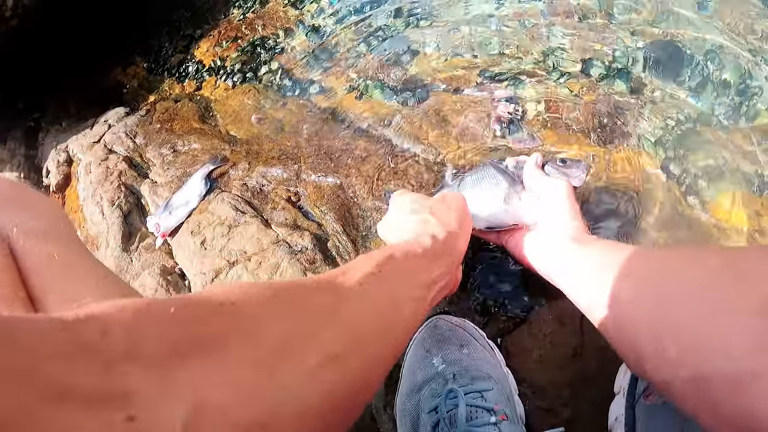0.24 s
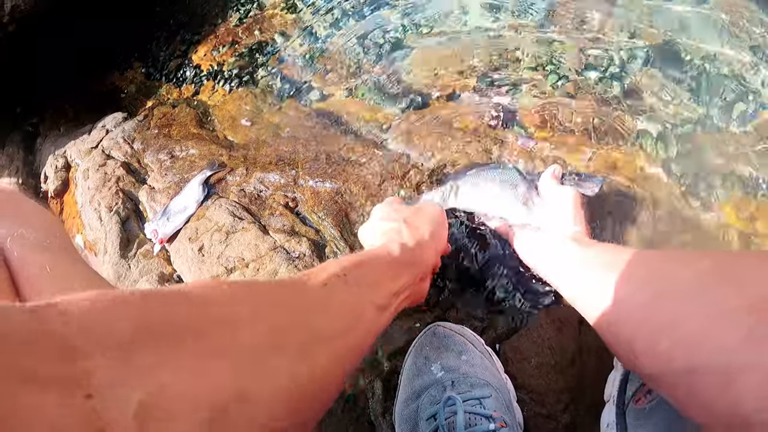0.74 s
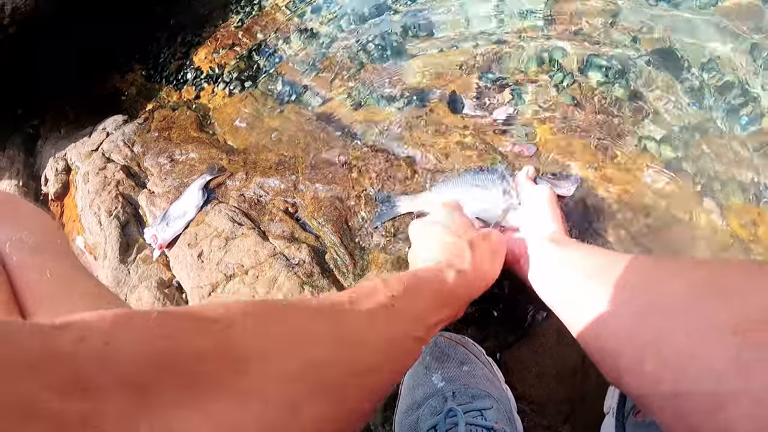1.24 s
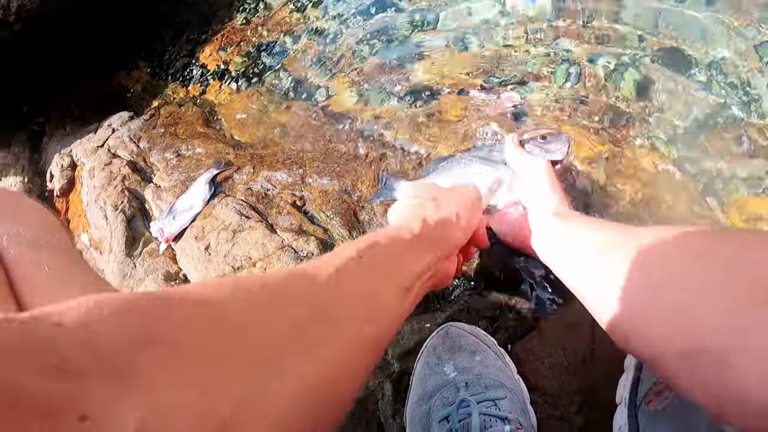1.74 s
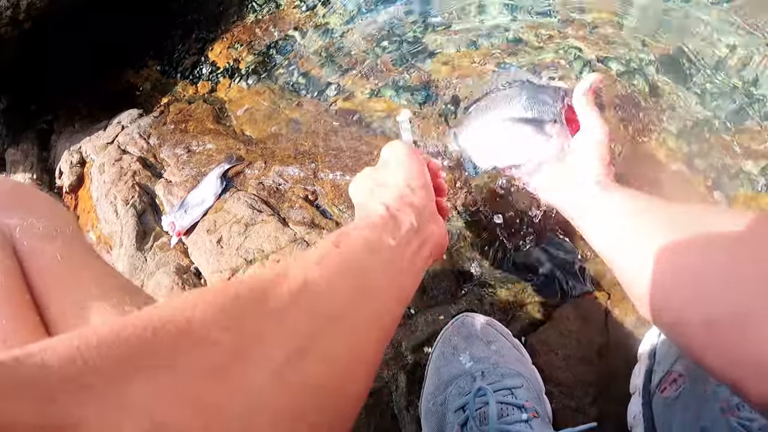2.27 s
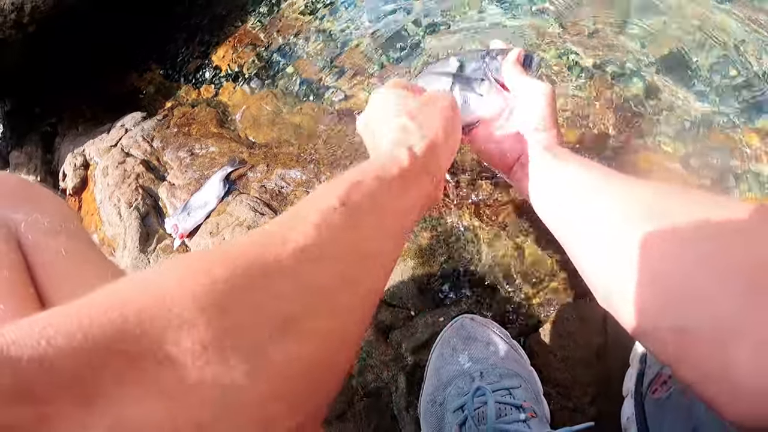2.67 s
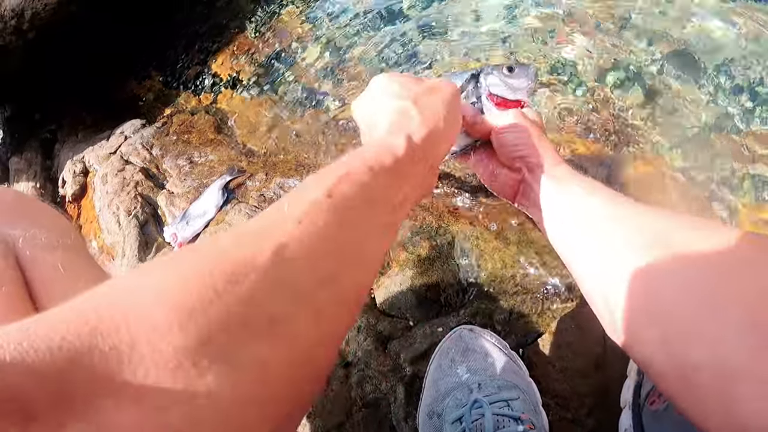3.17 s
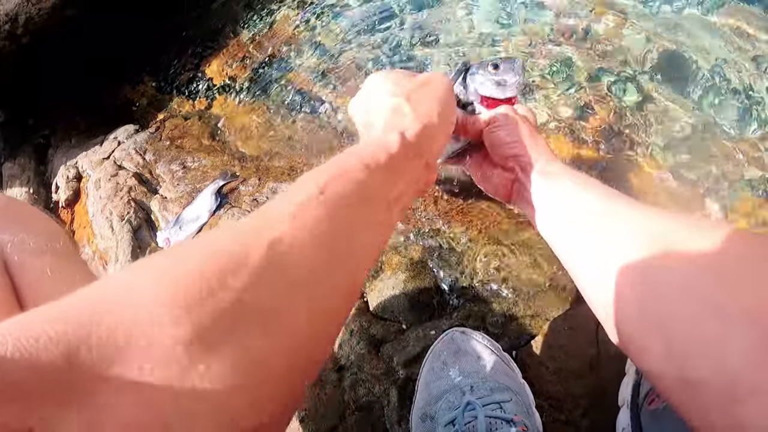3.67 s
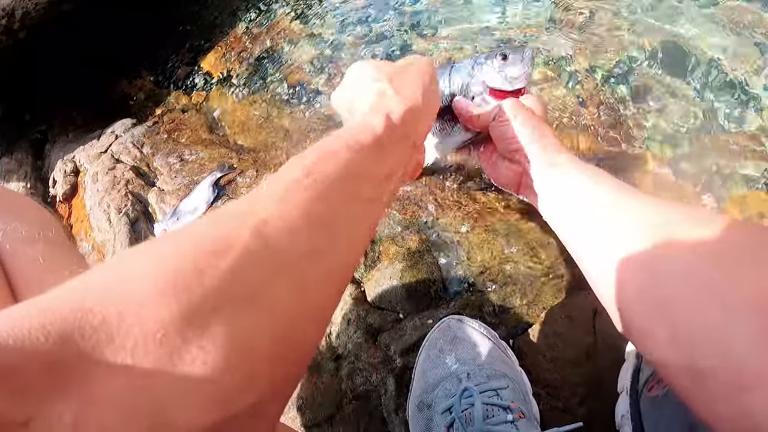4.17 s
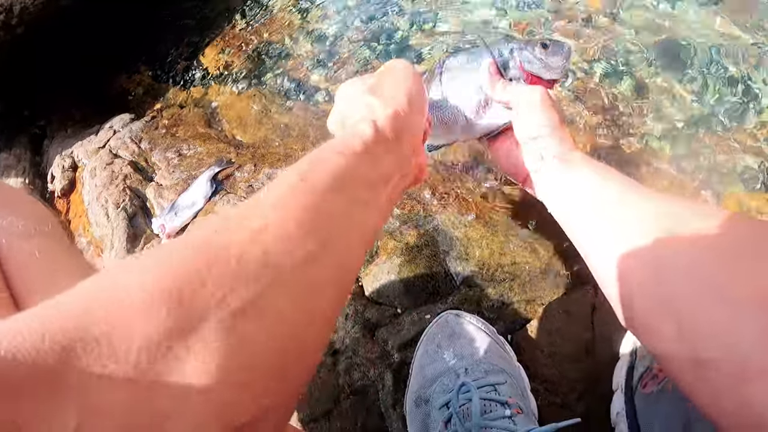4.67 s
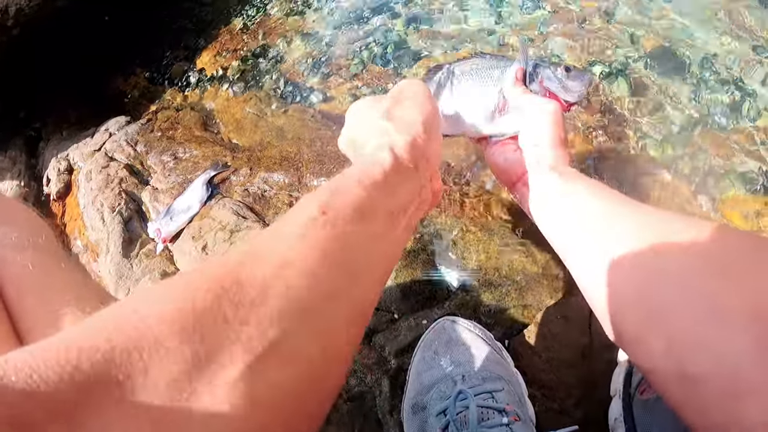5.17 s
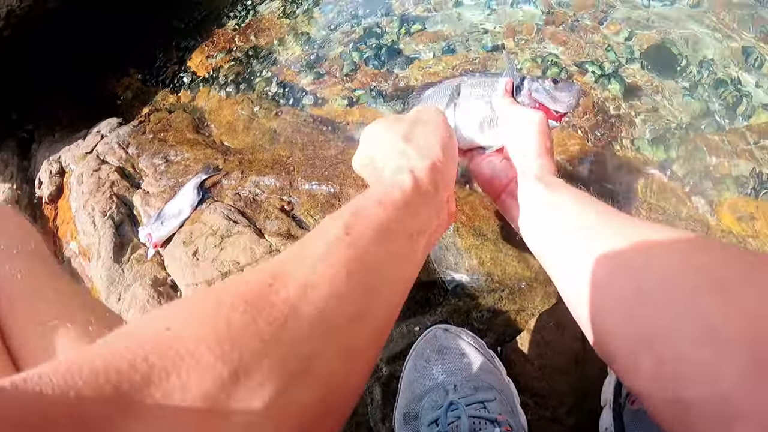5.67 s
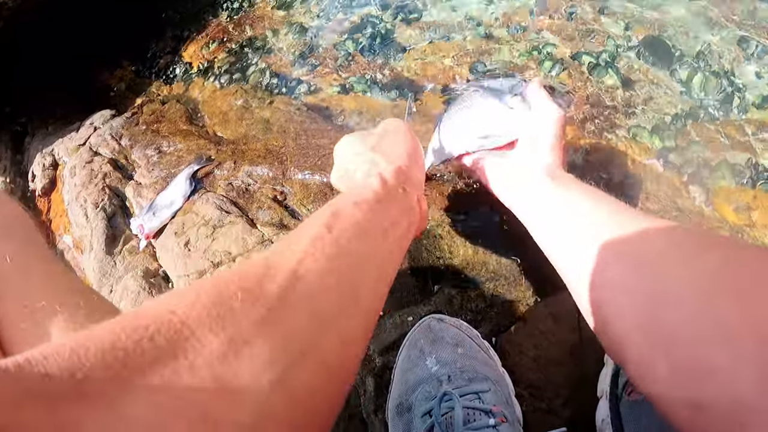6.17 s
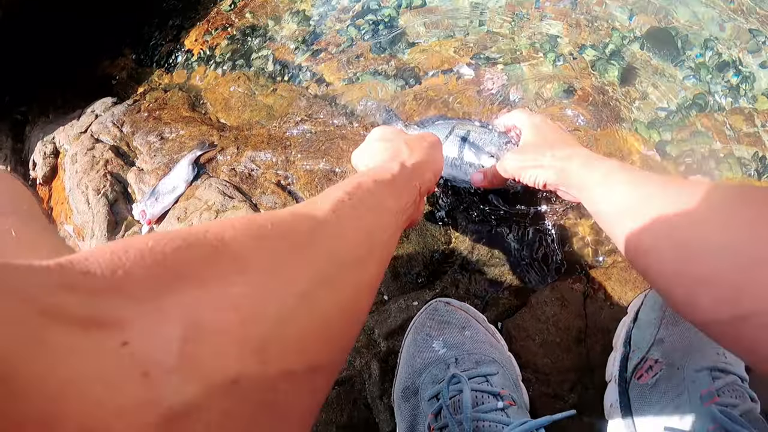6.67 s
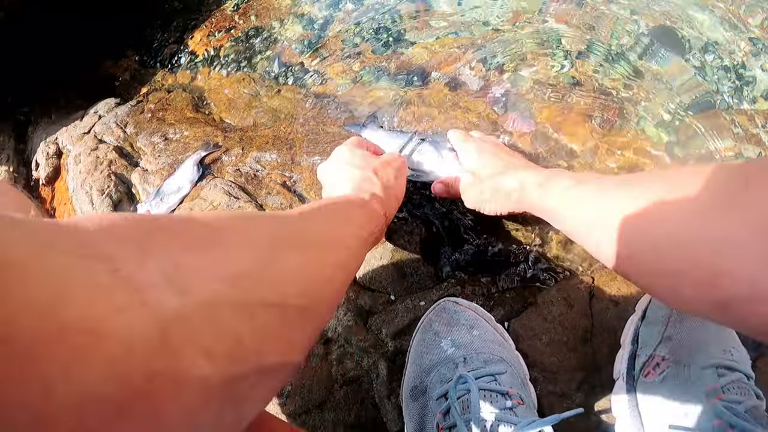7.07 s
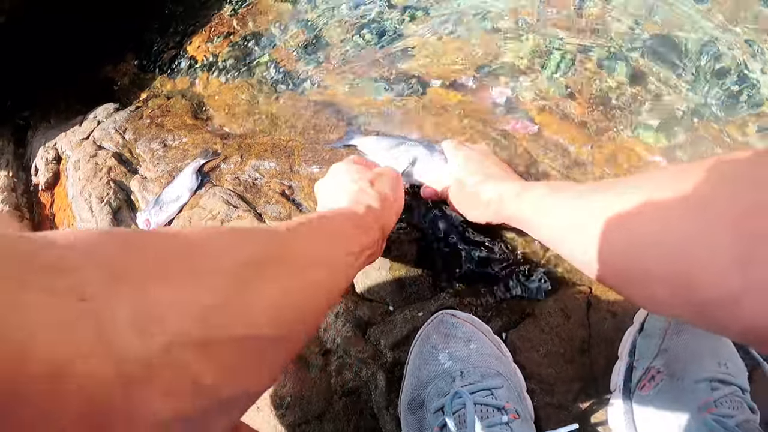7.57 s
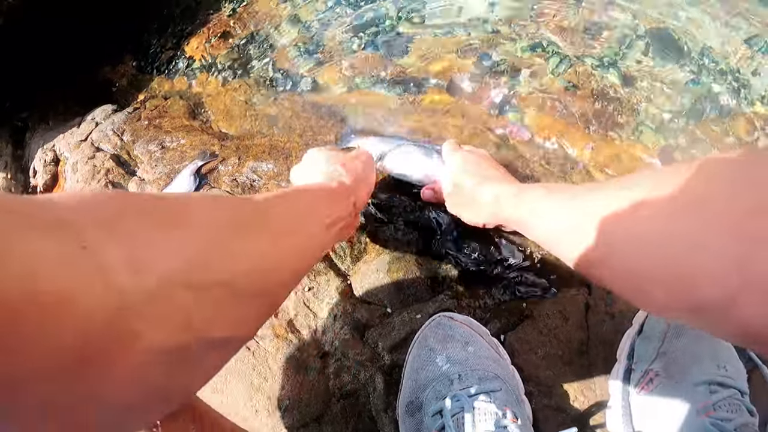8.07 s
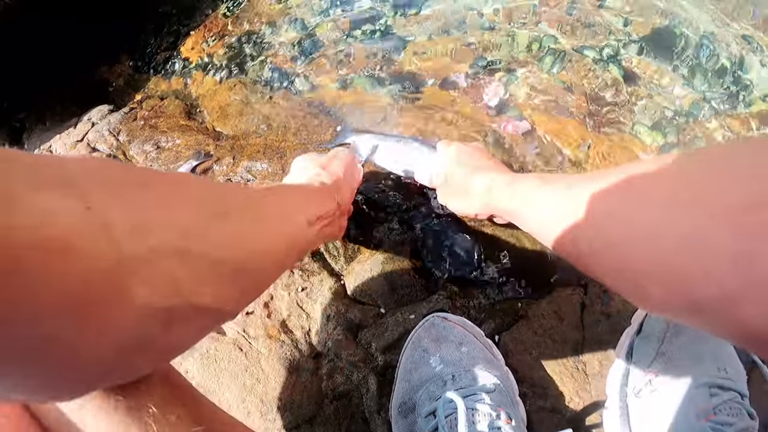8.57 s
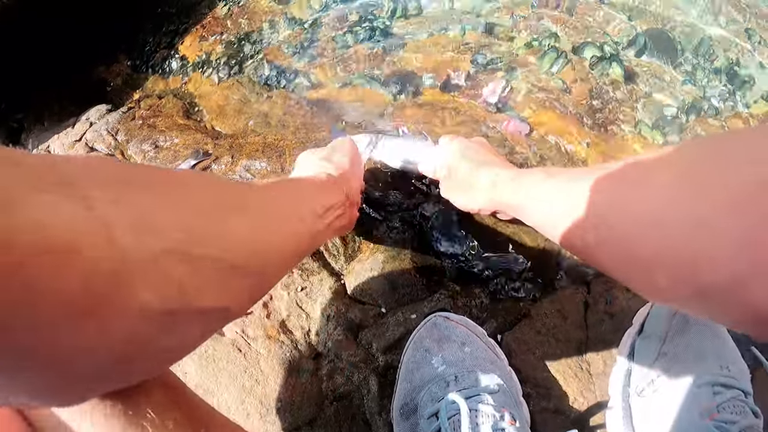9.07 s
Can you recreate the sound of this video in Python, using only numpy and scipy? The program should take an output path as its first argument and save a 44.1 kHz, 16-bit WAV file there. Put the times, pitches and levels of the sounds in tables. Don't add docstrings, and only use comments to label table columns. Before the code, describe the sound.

At a rocky shore, a small knife rasps over a fish about four times a second, with bright metallic ringing and snapping scales. Wet hands turn the fish with a knock, gulps and drips, then brisk scraping resumes. A louder splashy rinse follows, then duller, softer strokes at the waterline. Shallows wash and low wind and surf rumble throughout. Close chest-worn stereo microphone, narrowing and dulling near the end.

```python
import sys
import numpy as np
from scipy import signal
from scipy.fft import rfft, irfft, next_fast_len
from scipy.io import wavfile
from scipy.ndimage import uniform_filter1d

SR = 44100
rng = np.random.default_rng(int(sys.argv[2]) if len(sys.argv) > 2 else 0)


def gain_from_db(level_db):
    decades = np.asarray(level_db, float) / 20
    return 10 ** decades


def unload_audio(sound):
    columns = np.transpose(np.atleast_2d(sound))
    steps = np.round(np.clip(columns, -1, 1) * 32767)
    wavfile.write(sys.argv[1], SR, steps.astype(np.int16))


N = 410571


def evened(x):
    return x / np.sqrt(np.mean(x ** 2) + 1e-20)


def read(points, hz):
    f, value = np.transpose(points)
    return np.interp(np.log(hz + 1), np.log(f + 1), value)


def along(rows, t):
    s, level_db = np.transpose(rows)
    return np.interp(t, s, level_db)


def resonate(x, hz, width_hz):
    pole = np.exp((2j * np.pi * hz - np.pi * width_hz) / SR)
    return 2 * signal.lfilter([1 - abs(pole)], [1, -pole], x).real


def mode(x, hz, width_hz, second_hz, second_width_hz):
    return evened(resonate(resonate(x, hz, width_hz), second_hz, second_width_hz))


def add(mix, s, sound, pan_db=0):
    at = round(s * SR)
    sound = sound[max(-at, 0):]
    part = mix[:, max(at, 0):][:, :len(sound)]
    pair = np.array([sound, np.roll(sound, rng.integers(-1, 2))])
    part += pair[:, :part.shape[1]] * gain_from_db(np.array([[pan_db / 2], [-pan_db / 2]]))


def stroke(s, length, scratch_db, ring_db, low_db, peak, centre_hz, clear, flesh_db, body_db):
    u = np.linspace(0, 1, round(1.35 * length * SR))
    pressure = np.sin(np.pi * u ** (np.log(.5) / np.log(peak))) ** 1.55

    hiss, chance, size = rng.random((3, 4, 12000))[:, :, :len(u)]
    rub = hiss - .5
    flicks = (chance < 160 / SR) * gain_from_db(-3.5 * np.log(size + 1e-9))
    bursts = signal.lfilter([1], [1, -np.exp(-1 / (0.0016 * SR))], flicks)
    bursts = uniform_filter1d(bursts + 2.2 * bursts[:, ::-1], size=30)
    drive = rub * (0.53 + 0.53 * bursts + 0.27 * bursts[0])

    scratch = 0
    for ratio, x in zip((.85, 1.1), drive):
        scratch = scratch + mode(x, ratio * centre_hz, 3800, ratio * centre_hz, 3800)

    bend = 1 + 0.025 * (2 * size[:, 0] - 1)
    clear_ring = mode(rub[2] + .5 * drive[2], 4200 * bend[0], 350, 4250 * bend[0], 650)
    dull_ring = mode(drive[2], 3600, 3700, 3700, 3100)
    ring = evened(clear * clear_ring + (1 - clear) * dull_ring)
    low_ring = mode(rub[3] + .6 * drive[3], 2060 * bend[1], 280, 2080 * bend[1], 600)
    early = gain_from_db(-7.5 * (u - .5))

    popping = rub[1] * uniform_filter1d(flicks.sum(0), size=12)
    sound = evened(scratch)
    sound = sound + early * (gain_from_db(ring_db + .6) * ring + gain_from_db(low_db - 3.5) * low_ring)
    sound = sound + gain_from_db(flesh_db) * mode(drive[3], 1420, 740, 1380, 820)
    sound = sound + gain_from_db(body_db) * mode(drive[1], 420, 660, 420, 1050)
    sound = sound + gain_from_db(-1) * mode(drive[0], 11700, 3000, 11700, 3000)
    sound = sound + gain_from_db(-4.5) * evened(resonate(popping, centre_hz, 7000))
    return s - .17 * length, gain_from_db(scratch_db + 5) * pressure * sound


# start_s, length_s, scratch_db, low_ring_over_scratch_db
FLANK = [(-0.05, 0.14, -50, 7), (0.228, 0.105, -48.5, 9.5), (0.492, 0.096, -46.5, 9),
         (0.562, 0.04, -50.5, -6), (0.627, 0.045, -56, -7), (0.759, 0.033, -52.5, 16),
         (0.871, 0.059, -51, -3), (1.063, 0.082, -43, 4.5), (1.328, 0.095, -43, 3), (1.59, 0.058, -51, 15),
         (1.833, 0.085, -54.5, 3)]
# start_s, length_s, scratch_db, ring_over_scratch_db
BACK = [(2.995, 0.087, -49, 0.5), (3.217, 0.085, -43.5, -5), (3.45, 0.064, -45, -6),
        (3.692, 0.059, -45.5, -15), (3.762, 0.032, -48.5, -6), (3.951, 0.082, -46, -3.5),
        (4.176, 0.092, -45.5, -2), (4.427, 0.072, -47.5, -1.5), (4.668, 0.09, -51.5, -5),
        (4.929, 0.062, -47.5, -1), (5.204, 0.062, -49, 0), (5.434, 0.057, -50.5, 0),
        (5.668, 0.08, -50.5, -4.5)]
# start_s, length_s, scratch_db, ring_over_scratch_db
BELLY = [(7.413, 0.022, -63, 9), (7.535, 0.091, -56, 3), (7.764, 0.046, -54.5, -4), (7.806, 0.061, -55, 1),
         (7.975, 0.04, -57, 0.5), (8.03, 0.034, -56.5, -0.5), (8.296, 0.065, -52, 2),
         (8.545, 0.049, -51, 0), (8.59, 0.04, -55, 15), (8.61, 0.098, -65.5, 10), (8.34, 0.077, -60, 1),
         (8.775, 0.12, -52, -5), (9.025, 0.11, -50.5, -6), (9.28, 0.096, -55.5, -9)]
# start_s, length_s, spray_db, ring_over_spray_db
SPLASHES = [
    (1.978, 0.07, -58.5, 12.5),
    (2.146, 0.021, -59, 7),
    (2.37, 0.024, -64, 0),
    (2.33, 0.091, -63, 0),
    (2.458, 0.18, -54, 1),
    (2.63, 0.091, -64, -2),
    (6.44, 0.14, -53.5, 7),
    (6.612, 0.09, -79, -10),
    (6.72, 0.17, -74, -11),
]
FLANK_GRIP = dict(peak=0.5, centre_hz=8500, clear=0.6, flesh_db=-1.5, body_db=-2)
BACK_GRIP = dict(peak=.62, centre_hz=7400, clear=.85, flesh_db=-3, body_db=-6)
BELLY_GRIP = dict(peak=0.47, centre_hz=7300, clear=0.05, flesh_db=0.5, body_db=6.2)
SPLASH_GRIP = dict(peak=0.47, centre_hz=6700, clear=0.24, flesh_db=8.9, body_db=4.5)


def scraping(near):
    damped_low_db = -1.5
    for s, length, db, low_db in FLANK:
        add(near, *stroke(s, length, db, -6.5, low_db, **FLANK_GRIP))
    for rows, grip in ((BACK, BACK_GRIP), (BELLY, BELLY_GRIP), (SPLASHES, SPLASH_GRIP)):
        for row in rows:
            add(near, *stroke(*row, damped_low_db, **grip))
    for s, length, db, ring_db in BACK:
        if length > .045:
            add(near, *stroke(s + .14, 0.026, db - 13, ring_db, damped_low_db, **BACK_GRIP))


def tick(s, db, hz, share, spit):
    t = np.arange(len(spit)) / SR
    ring = np.sin(2 * np.pi * hz * t) * gain_from_db(-60 * t * hz / 25)
    noise = (spit - 0.73 * np.roll(spit, 1)) * gain_from_db(-60 * t / 0.015)
    onset = 1 - np.exp(-t / 0.000076)
    return s, gain_from_db(db) * onset * (1.34 * ring + share * noise)


# start_s, peak_db, pitch_hz
TICKS = [(0.544, -16.5, 8700), (0.6322, -27, 5100), (1.079, -20, 7500), (1.3618, -11, 9400),
         (2.0909, -20.5, 3800), (2.134, -15.5, 4950), (3.0695, -15, 7400), (3.603, -21.5, 7000),
         (3.676, -21.5, 6200), (4.052, -25, 6800), (4.521, -27, 6000), (5.049, -29, 4500),
         (5.7, -22.5, 8400), (6.4816, -12, 5150), (6.5645, -19.5, 4880), (6.628, -28.5, 2650),
         (6.717, -21.5, 5100), (6.7425, -15.5, 5100), (6.7783, -20, 4670), (6.812, -23.5, 4740),
         (7.421, -24, 9600), (7.415, -34, 6000), (7.105, -46, 9000), (7.312, -41, 7000), (5.126, -44, 5000),
         (1.876, -36, 8000), (8.6106, -13.5, 3500)]
# start_s, peak_db
COMMON_PITCH_TICKS = [(1.9927, -18), (2.117, -25), (2.7066, -23.5), (2.87, -22), (3.1076, -21.5), (3.1257, -27),
                      (3.244, -22), (3.351, -23.5), (4.1863, -23.5), (4.218, -28), (4.735, -18), (4.7591, -15.5),
                      (4.97, -19), (6.408, -22.5), (6.4502, -15.5)]
# start_s, peak_db, pitch_hz
SNAPS = [(0.2379, -44, 4140), (0.2536, -21.5, 7310), (0.581, -26, 6000), (0.665, -40, 6500),
         (0.7612, -39, 4200), (0.9178, -30, 6670), (1.3508, -18, 9370), (1.386, -31, 4260),
         (1.4085, -21.5, 4140), (1.5098, -32, 6410), (2.3344, -28, 2920), (2.353, -32.5, 3300),
         (2.3783, -30, 2800), (2.3908, -28, 5100), (2.411, -27, 2180), (2.441, -26, 2600),
         (2.4888, -24, 5400), (2.5367, -32, 3800), (2.729, -32, 4250), (2.7601, -30, 6160),
         (2.9427, -30, 3560), (3.0525, -38, 4180), (3.2713, -30, 4300), (3.48, -25, 6490),
         (3.496, -32, 4300), (3.669, -26.5, 4200), (3.7279, -21.5, 7080), (3.739, -25, 5600),
         (3.7763, -28, 4890), (3.784, -32, 6500), (3.9904, -29, 9590), (4.446, -27, 4320),
         (4.591, -49, 7100), (4.735, -18.5, 8200), (4.7636, -17, 8100), (4.848, -32.5, 4140),
         (4.899, -40, 7900), (4.9462, -35, 4180), (4.979, -18, 4100), (5.1567, -37, 6000),
         (5.2036, -35, 4250), (5.228, -22.5, 5620), (5.459, -31, 4260), (5.685, -31, 4670),
         (6.435, -33, 6210), (6.5906, -24, 5530), (6.762, -26, 4160), (6.8438, -33, 3660),
         (7.218, -41, 4500), (7.562, -31, 4050), (7.5828, -25.5, 4080), (7.814, -34, 4200),
         (8.0391, -34, 6000), (8.319, -20.5, 8000), (8.5679, -38, 5030), (8.6023, -41, 3570),
         (8.78, -26, 7610), (9.047, -40, 2690), (9.074, -31, 2720), (9.097, -37, 7000)]


def snaps_and_drops(near):
    ticks = [(*row, 0.32) for row in TICKS]
    ticks += [(s, db, 4100, 0.32) for s, db in COMMON_PITCH_TICKS]
    ticks += [(*row, 0.58) for row in SNAPS]
    for row, spit in zip(ticks, rng.standard_normal((len(ticks), 600))):
        add(near, *tick(*row, spit))


def thump(s, db, hz, length):
    u = np.linspace(0, 1, round(length * SR))
    lump = resonate(resonate(rng.standard_normal(9000), hz, 1.3 * hz), hz, 1.3 * hz)[-len(u):]
    return s, gain_from_db(db - 8.0) * evened(lump) * np.sin(np.pi * u ** 0.66)


# start_s, peak_db, pitch_hz, length_s
THUMPS = [(2.135, -2.5, 1880, 0.002), (4.756, -19, 1080, 0.014), (4.971, -19, 1140, 0.012),
          (6.481, -13.5, 865, 0.0041), (7.038, -19, 1050, 0.0036), (7.109, -19, 92, 0.085),
          (7.122, -22.5, 300, 0.026), (8.558, -26.5, 380, 0.036), (9.046, -18, 600, 0.015),
          (9.069, -22, 450, 0.021), (8.808, -25, 396, 0.022), (9.293, -21, 400, 0.02),
          (0.555, -28, 810, 0.03), (8.609, -28.5, 2850, 0.026), (3.471, -15, 43, 0.054),
          (4.451, -17, 75.5, 0.073), (4.566, -23.5, 72.5, 0.15), (8.083, -29.5, 77, 0.099)]


def knocks(near):
    for row in THUMPS:
        add(near, *thump(*row))


def bubble(s, db, start_hz, end_hz, length, bend, shake):
    u = np.arange(0, 1.3 * length, 1 / SR) / length
    t = u * length
    shake = evened(uniform_filter1d(shake, size=150))[:len(u)]
    click = .5 * np.exp(-t / 0.0003)
    hz = start_hz * (end_hz / start_hz) ** (np.minimum(u, 1.1) ** bend)
    hz = hz * (1 + .016 * shake + click)
    decay_db = -15 * u * min(start_hz / end_hz, 1) ** 0.46
    swell = (1 - np.exp(-t / 0.00039)) * gain_from_db(decay_db + 1.38 * shake[::-1])
    swell = swell * np.clip((1.2 - u) / 0.43, 0, 1)
    turn = 2 * np.pi * np.cumsum(hz) / SR
    ring = np.sin(turn) + gain_from_db(-21.5 - 20 * u) * np.sin(1.5 * turn)
    return s - .001, gain_from_db(db + 5.5) * swell * ring, np.clip(shake[0], -1, 1)


# start_s, peak_db, pitch_hz
PINGS = [(0.633, -21.5, 2120), (1.983, -23.5, 2160), (2.134, -28, 374), (2.244, -34, 400),
         (2.276, -28, 1420), (2.328, -31, 505), (2.338, -29, 1430), (2.385, -37, 690), (2.58, -26.5, 887),
         (2.59, -32, 1600), (3.073, -24, 1300), (3.108, -29, 1370), (5.157, -30, 3120),
         (6.306, -33.5, 1090), (6.464, -23.5, 1750), (6.491, -29, 570), (6.522, -17.5, 1200),
         (6.546, -24.5, 2500), (6.743, -17, 2200), (6.744, -23, 1200), (6.779, -20.5, 2380),
         (6.813, -38, 1200), (6.83, -32, 2620), (6.845, -31, 1560), (7.011, -32, 980), (2.008, -33, 640),
         (2.07, -35, 2200), (2.311, -33, 1290), (2.44, -36, 636), (6.499, -28, 2600), (6.532, -28, 3200),
         (6.481, -31, 517), (6.511, -15.5, 1200)]
# start_s, peak_db, pitch_hz
PLOPS = [(2.071, -25.5, 1200), (2.237, -28.5, 1450), (2.24, -52, 573), (2.253, -39, 950),
         (2.472, -32.5, 1090), (2.658, -30.5, 1460), (2.696, -39, 656), (2.782, -24.5, 1196),
         (2.977, -20, 997), (3.17, -31.5, 1390), (3.509, -31, 1217), (3.666, -37, 1064),
         (3.911, -33.5, 990), (4.002, -36, 804), (3.994, -40, 1760), (3.447, -43, 1750),
         (3.795, -37.5, 1170), (2.365, -38, 644), (2.462, -41, 572), (2.582, -39, 564), (2.645, -39, 770),
         (2.143, -65, 810), (6.6, -42, 2750), (6.84, -40.5, 483), (4.146, -31, 1147), (5.127, -42, 1970),
         (6.51, -36, 700), (6.606, -26.5, 890), (7.017, -39, 2300)]
# start_s, peak_db, start_hz, end_hz, length_s
GLIDES = [(1.995, -24.0, 1370, 820, 0.012), (2.421, -33.0, 1040, 1410, 0.011),
          (2.44, -28.5, 937, 1480, 0.033), (2.506, -30.5, 1000, 900, 0.03),
          (3.026, -32.0, 1450, 1050, 0.037), (4.03, -36.0, 850, 1900, 0.042),
          (6.503, -19.0, 1030, 1250, 0.013), (6.538, -22.0, 1000, 650, 0.013),
          (6.545, -26.0, 570, 1450, 0.047), (6.629, -18.0, 1290, 1980, 0.017),
          (6.631, -17.0, 937, 2040, 0.037), (7.041, -22.5, 900, 1600, 0.048),
          (6.49, -22.0, 520, 1100, 0.015), (6.667, -31.0, 2050, 2200, 0.018),
          (6.75, -29.0, 2000, 2350, 0.018), (6.812, -30.0, 1300, 900, 0.025),
          (2.375, -31.0, 640, 800, 0.035)]
# start_s, peak_db, start_hz, end_hz,
# length_s
SLIDES = [(1.414, -32.0, 800, 1600, 0.024), (1.823, -24.0, 1150, 1900, 0.03),
          (6.715, -21.0, 1300, 2170, 0.014), (2.47, -33.0, 1200, 1600, .03), (2.335, -31.0, 480, 650, .03),
          (2.145, -32.0, 750, 1100, .015), (6.646, -31.0, 2300, 2900, .014),
          (7.043, -34.0, 2000, 3000, .014), (7.088, -38.0, 1700, 2100, .02), (2.24, -33.0, 560, 700, .04),
          (6.52, -26.0, 650, 800, .03), (4.318, -38.0, 2900, 2500, .012)]


def air_pockets(near):
    pockets = []
    for rows, cycles in ((PINGS, 13.0), (PLOPS, 26.0)):
        pockets += [(s, db, hz, 1.008 * hz, cycles / hz, 2.1) for s, db, hz in rows]
    pockets += [(*row, 2.1) for row in GLIDES]
    pockets += [(*row, .9) for row in SLIDES]
    for row, shake in zip(pockets, rng.standard_normal((len(pockets), 4000))):
        add(near, *bubble(*row, shake))


def trickle(low_hz, top_hz, per_s, turns, level_db):
    size = gain_from_db(4.0 * np.minimum(rng.exponential(1, N), 3))
    size = size * (rng.random(N) < per_s / SR)
    kind, out = rng.integers(0, 10, N), np.zeros((2, N))
    pitches_hz = np.geomspace(low_hz, top_hz, num=10) * rng.uniform(0.93, 1.051, 10)
    for k, hz in enumerate(pitches_hz):
        cycles, slide = np.arange(0, 6 * turns, hz / SR), rng.uniform(-.002, .008)
        grain = np.sin(2 * np.pi * cycles * (1 + slide * cycles))
        grain = grain * np.sqrt(cycles) * np.exp(-cycles / turns)
        balance = gain_from_db(np.array([[1], [-1]]) * rng.normal(0, 0.99))
        out += signal.oaconvolve(size * (kind == k), grain)[:N] * balance
    return evened(out) * gain_from_db(level_db)


# fullest_s, gurgle_db, fizz_db, swell_db_per_s, drain_db_per_s
POURS = [
    (2.0, -38.5, -66, 400, 62),
    (2.45, -41, -53, 38, 11.5),
    (6.49, -31, -34.5, 406, 93),
    (6.75, -43.5, -44.5, 300, 82),
]


def runoff():
    drip_gurgle_db, drip_fizz_db = -56, -67
    t = np.arange(N) / SR
    s, gurgle_db, fizz_db, swell, drain = np.transpose(POURS)[:, :, None]
    flow_db = swell * np.minimum(t - s, 0) - drain * np.maximum(t - s, 0)
    dry_db = -12 * np.clip((t - 6.9) / 0.048, 0, 1)
    gurgle_db = np.maximum((gurgle_db + flow_db).max(0), drip_gurgle_db) + dry_db
    fizz_db = np.maximum((fizz_db + flow_db).max(0), drip_fizz_db) + dry_db
    crackle_db = -67 + .5 * (fizz_db - drip_fizz_db)
    gurgle = trickle(low_hz=760, top_hz=3170, per_s=600, turns=3.8, level_db=gurgle_db)
    gulps = trickle(low_hz=380, top_hz=950, per_s=120, turns=3.9, level_db=gurgle_db - 4.5)
    fizz = trickle(low_hz=2460, top_hz=8770, per_s=480, turns=3.8, level_db=fizz_db)
    crackle = trickle(low_hz=3500, top_hz=9600, per_s=16, turns=0.83, level_db=crackle_db)
    return gurgle + gulps + fizz + crackle


# time_s, level_db
WATER = [(0, 1.5), (2.77, 3.5), (5.37, 1), (6.74, 4.5), (7.05, 0), (9.31, 2)]
# freq_hz, density_db
SURF = [(70, -7), (110, -0.5), (190, 1), (270, -7.5), (400, -10.5), (480, -17), (620, -28.5), (1200, -64.5)]
# freq_hz, density_db
WASH = [(400, 4.5), (600, -4), (780, -3), (1050, 0), (1550, -7.5), (2200, -10.5), (2800, -15), (4000, -49)]
# freq_hz, density_db
HISS = [(2200, -5), (3000, 5), (3650, -0.5), (4350, 6.5), (5400, -1), (7600, -2), (9400, -7.5),
        (12100, -19), (15600, -44)]
# freq_hz, likeness (0-1)
SAME = [(40, 1), (130, 0.99), (440, 0.98), (1100, 0.95), (3700, 0.39), (9000, 0.53), (13000, 0.43)]
# freq_hz, lead_radians
LEAD = [(85, 0), (430, -.62), (1100, -1.1), (2700, -1.35), (3700, -.4), (6500, -.3), (9000, .15),
        (13000, 0)]


def surf_and_wash():
    frames, hz = N // 256 + 5, np.fft.rfftfreq(1024, 1 / SR)
    t = np.arange(frames) * 256 / SR
    a, b, c, d, patches = rng.standard_normal((frames, 513, 5)).T
    patches = uniform_filter1d(uniform_filter1d(patches, size=10, axis=0), size=10, axis=1)
    patches_db = 1.9 * evened(patches) * np.clip(hz / 900, 0, 1)[:, None]

    stir_db = along(WATER, t)
    surf_db = -27.5 - 0.3923 * t
    wash_db = -42.5 - 0.1458 * t + stir_db
    hiss_db = -57 + 1.8 * stir_db
    power = 0
    for shape, level_db in ((SURF, surf_db), (WASH, wash_db), (HISS, hiss_db)):
        density = gain_from_db(read(shape, hz)) ** 2
        power = power + (density / density.sum())[:, None] * gain_from_db(level_db) ** 2

    same, left = np.clip(read(SAME, hz), -1, 1)[:, None], a + 1j * b
    right = same * left + np.sqrt(1 - same ** 2) * (c + 1j * d)
    z = np.array([left * np.exp(1j * read(LEAD, hz))[:, None], right])
    z *= np.sqrt(power) * gain_from_db(patches_db)
    return gain_from_db(3.0) * signal.istft(z, nperseg=1024, noverlap=768)[1][:, :N]


# freq_hz, density_db
BUFFET = [(8, -22), (22, -6), (45, -6.5), (60, 2), (90, -10.5), (200, -106)]
# freq_hz, density_db
BOOM = [(45, -7.5), (66, -6.5), (80, -4), (96, -3.5), (140, -13.5), (300, -95)]
# time_s, level_db
WIND = [(0.1, -41), (3.6, -29), (4.3, -58), (4.85, -51), (6.56, -31.5), (7.18, -25), (7.49, -33.5),
        (9.31, -33)]
# time_s, level_db
SWELL = [(0, -47), (0.2, -27.5), (4.7, -24.5), (4.85, -19.5), (6.56, -31), (7.18, -28.5), (7.491, -37.5),
         (8.95, -26.5), (9.31, -50)]


def wind_and_boom():
    t, fine_hz, out = np.arange(N) / SR, np.fft.rfftfreq(16384, 1 / SR), 0
    for shape, levels in ((BUFFET, WIND), (BOOM, SWELL)):
        shared, own = rng.standard_normal(N), rng.standard_normal((2, N))
        colour = signal.firwin2(8191, fine_hz, gain_from_db(read(shape, fine_hz)), fs=SR)
        noise = signal.oaconvolve(shared + 0.3 * own, colour[None], "same")
        out = out + gain_from_db(along(levels, t)) * evened(noise)
    return out


# freq_hz, left_over_right_db, gain_db
PORT = [(300, 1.5, 8), (1200, 1.5, -0.5), (2360, -3, 2), (4420, -3, 3.5), (7600, 0.5, 2.5), (9700, -1, 2),
        (11520, 3, -7), (15500, -2, -21)]


def ports(x):
    size = next_fast_len(N)
    hz = np.fft.rfftfreq(size, 1 / SR)
    pan_db, gain_db = (read(np.array(PORT)[:, [0, k]], hz) for k in (1, 2))
    turn = np.exp(.5j * read(LEAD, hz)) * gain_from_db(pan_db / 2)
    return irfft(rfft(x, size) * [turn, 1 / turn] * gain_from_db(gain_db), size)[:, :N]


def scene():
    near = np.zeros((2, N))
    scraping(near)
    snaps_and_drops(near)
    knocks(near)
    air_pockets(near)
    near += runoff()
    rocks = rng.standard_normal(3000) + 0.12 * rng.standard_normal((2, 3000))
    rocks = rocks * gain_from_db(-60 * np.arange(3000) / SR / 0.039)
    echo = signal.oaconvolve(near, rocks / np.linalg.norm(rocks[0]), axes=1)[:, :N]
    shore = (surf_and_wash() + wind_and_boom()) * gain_from_db(np.array([[.8], [-.8]]))
    return ports(near + gain_from_db(-11.0) * echo) + shore


# freq_hz, level_db per bin
GATE = [(8000, -115), (10500, -100), (12500, -100), (15500, -93)]


def gate(x):
    hz, _, z = signal.stft(x, SR, nperseg=1024, noverlap=768)
    bands = (np.abs(z[:, :512]) ** 2).reshape(2, 32, 16, -1).mean(2)
    over_db = 10 * np.log10(bands + 1e-20) - read(GATE, hz[8:512:16])[:, None]
    cut_db = -22 / (1 + np.exp(np.clip(over_db, -30, 30)))
    z[:, :512] *= np.repeat(gain_from_db(cut_db), 16, axis=1)
    z[:, hz > 15600] = 0
    return signal.istft(z, SR, nperseg=1024, noverlap=768)[1][:, :N]


# time_s, side_db
WIDTH = [(7.2, 0), (7.75, -15.5), (8.3, -43), (8.55, -37), (8.8, -28), (9.3, -10.5)]
# freq_hz, gain_db
ALONE = [(700, -0.5), (1250, -7), (2900, -0.5), (4400, -4), (6500, -7), (7600, -2), (8800, -10.5),
         (11000, -6), (14000, 0)]


def one_port(x):
    t, size = np.arange(N) / SR, next_fast_len(N)
    mid, side = (x[0] + x[1]) / 2, (x[0] - x[1]) / 2
    colour = gain_from_db(read(ALONE, np.fft.rfftfreq(size, 1 / SR)))
    alone = irfft(rfft(mid, size) * colour, size)[:N]
    mid = mid + np.clip((t - 7.4) / 0.52, 0, 1) * (alone - mid)
    side = side * gain_from_db(along(WIDTH, t))
    return np.array([mid + side, mid - side])


def roll_off(x):
    return signal.sosfilt(signal.butter(12, 15700, fs=SR, output="sos"), x)


def record(dry):
    dry = signal.lfilter(*signal.butter(2, 18, "high", fs=SR), dry)
    mix = np.clip(gate(one_port(dry)), -1, 1)
    return roll_off(mix)


dry = scene()
out = record(dry)
unload_audio(out)
```